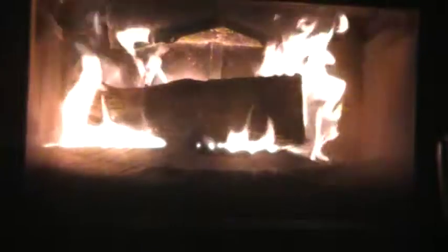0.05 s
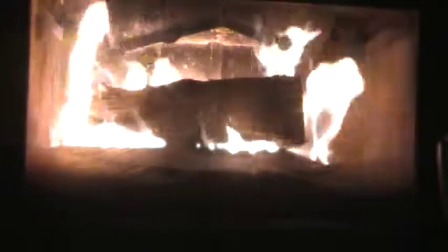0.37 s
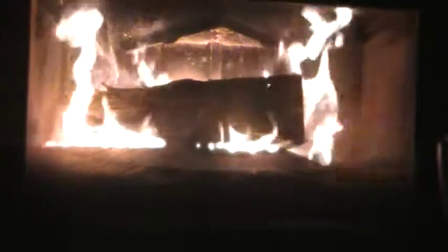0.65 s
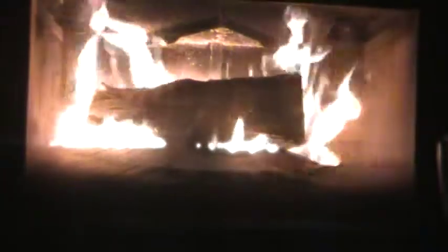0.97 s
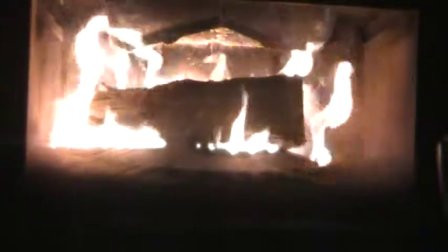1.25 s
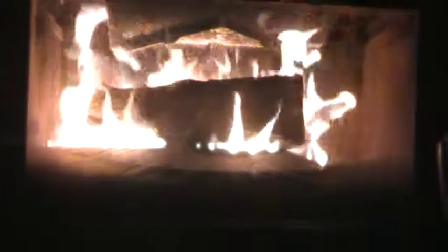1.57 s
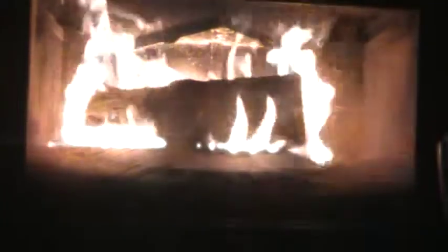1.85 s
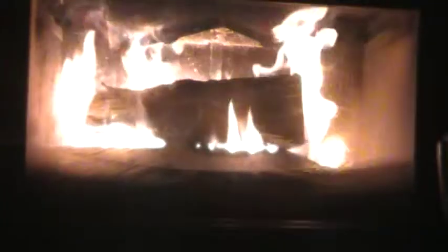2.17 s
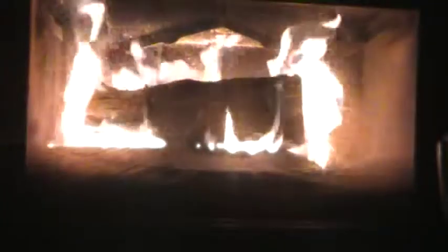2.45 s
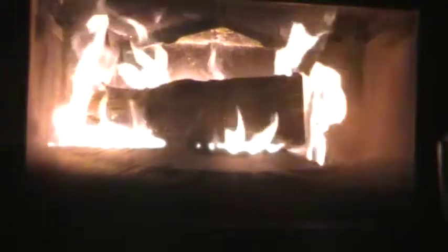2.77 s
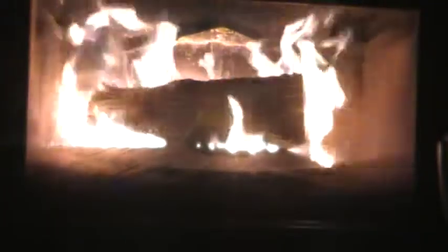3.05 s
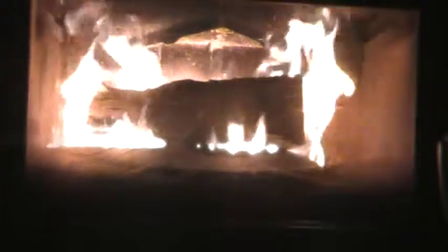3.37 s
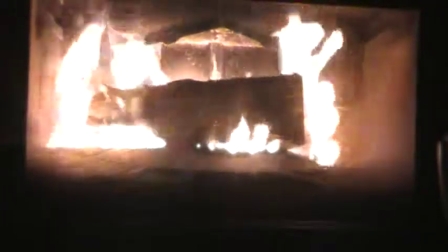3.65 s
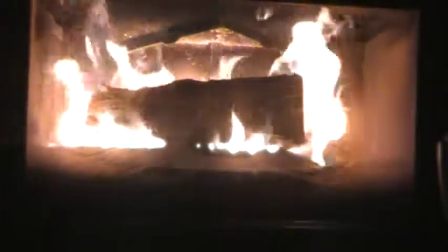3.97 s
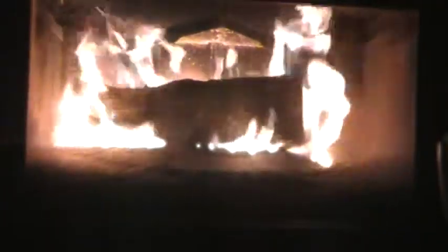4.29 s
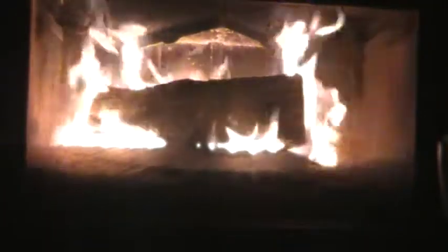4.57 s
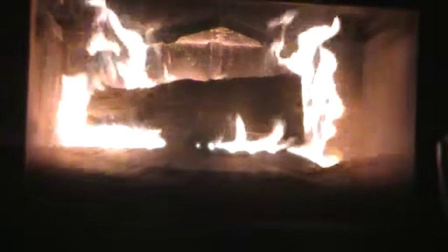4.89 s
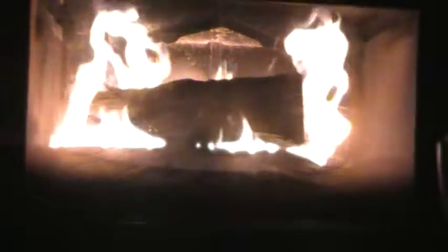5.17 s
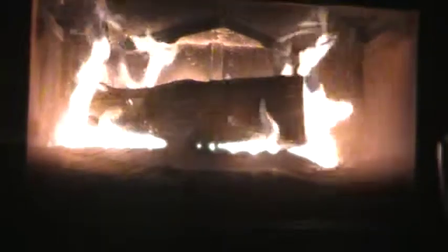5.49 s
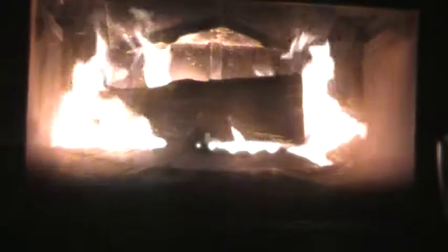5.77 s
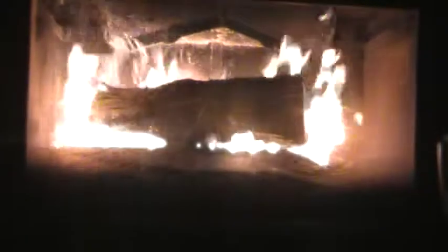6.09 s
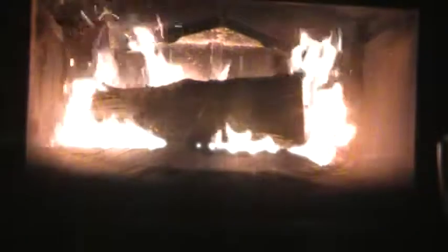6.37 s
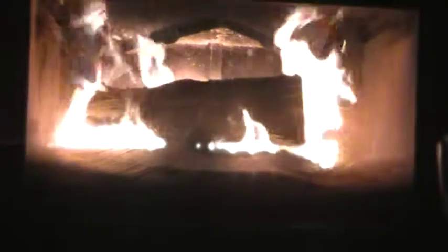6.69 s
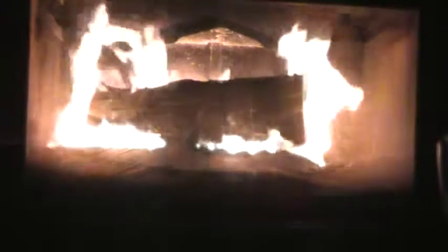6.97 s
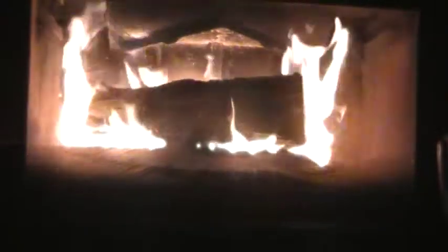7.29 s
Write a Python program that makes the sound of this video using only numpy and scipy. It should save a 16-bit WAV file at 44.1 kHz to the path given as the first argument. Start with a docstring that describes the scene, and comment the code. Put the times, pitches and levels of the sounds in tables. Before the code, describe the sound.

Logs burn in a closed fireplace in a quiet room, giving crisp, high crackles over ticking embers and a soft rush of flame. A few sharp snaps and dull knocks come from the firebox. Late on, the draught swells in the flue, one very loud snap rings out, and the flames rise to a gentle low roar. A brief sizzle comes near the end. The microphone picks up plenty of room reflection.

```python
"""Burning logs crackle in a closed fireplace in a quiet, live room: resin pockets burst in spits of tiny
fractures, heard mostly by way of the walls. Sharp snaps ring the firebox, one of them very loud,
and a few dull knocks sound from the fire. Underneath, embers tick, the flames rush softly and flare
into a low roar, the draught swells in the flue, and gas sizzles briefly from a log."""
import sys
import numpy as np
from scipy import signal
from scipy.fft import rfft, irfft
from scipy.io import wavfile
from scipy.ndimage import uniform_filter1d

SR = 44100
rng = np.random.default_rng(int(sys.argv[2]) if len(sys.argv) > 2 else 0)


def unload_wav(signal):
    """Save mono or channel-first audio to the path in sys.argv[1] as 16-bit WAV at rate SR, clipped to [-1, 1]."""
    wavfile.write(
        sys.argv[1],
        SR,
        np.round(np.clip(np.atleast_2d(signal).T, -1, 1) * 32767).astype(np.int16),
    )


N = 327663
TIME = np.arange(N) / SR
AGE = np.arange(SR) / SR  # seconds since a hit


def undb(db):
    """Decibels to gain."""
    return 10 ** (np.asarray(db) / 20)


def on_log_axis(points, hz):
    """Read a curve of (freq_hz, value) points at any frequency."""
    freq_hz, value = np.transpose(points)
    return np.interp(np.log(hz + 1), np.log(freq_hz), value)


def colour(x, spectrum):
    """EQ x with a spectrum; rms 1."""
    gain = undb(on_log_axis(spectrum, np.fft.rfftfreq(len(x), 1 / SR)))
    shaped = irfft(rfft(x) * gain, len(x))
    return shaped / np.std(shaped)


def noise(spectrum, size=SR):
    """Coloured noise, rms 1."""
    return colour(rng.standard_normal(size), spectrum)


def resonate(x, hz, width_hz):
    """One resonance, gain 1 at the centre."""
    return signal.lfilter(*signal.iirpeak(hz, hz / width_hz, fs=SR), x)


def high_pass(x, hz, order):
    """Roll off the lows."""
    return signal.sosfilt(signal.butter(order, hz, "high", fs=SR, output="sos"), x)


def fade(t60_s, rise_s):
    """Fast attack, exponential decay."""
    return (1 - np.exp(-AGE / rise_s)) * np.exp(-np.log(1000) * AGE / t60_s)


def swell(peak_s, db, rise_s, fall_s):
    """Gain of a flow that builds and ebbs: a bell with its own width on each side."""
    since = TIME - peak_s
    return undb(db) * np.exp(-(since / np.where(since < 0, rise_s, fall_s)) ** 2)


def flutter(rate_hz):
    """Random sample-and-hold, smoothed twice; spread near 1."""
    hold = int(SR / rate_hz)
    steps = np.repeat(rng.standard_normal(N // hold + 1), hold)
    return uniform_filter1d(uniform_filter1d(steps, hold), hold)[:N] * np.sqrt(2)


def attack_level(x, db, samples):
    """Scale x so that its first samples have an rms of db."""
    return x * undb(db) / np.sqrt(np.mean(x[:samples] ** 2))


def ring(modes, rise_s, pitch=1, length=1, scatter_cycles=0.2):
    """Damped modes struck together; each hit lands elsewhere and scatters their phases."""
    out = np.zeros(SR)
    for hz, db, t60_s in modes:
        cycles = pitch * hz * (AGE - rise_s) + scatter_cycles * rng.standard_normal()
        out += undb(db) * fade(t60_s * length, rise_s) * np.cos(2 * np.pi * cycles)
    return high_pass(out, hz=338, order=2)  # small surfaces radiate little bass


def add(out, start_s, x):
    """Mix x in at start_s."""
    i = max(0, int(start_s * SR))
    out[i:i + len(x)] += x[:max(0, N - i)]


# Reverb time of the room: freq_hz, t60_s
ROOM_DECAY = [(150, 0.4), (600, 0.84), (2500, 0.73), (5000, 0.67), (9000, 0.47), (15000, 0.28)]
def room_tail(send, rise_s):
    """Shape steady noise into the room's diffuse tail: it builds up, and the highs die first."""
    hz, age_s, bands = signal.stft(send, SR, nperseg=768)
    bands = bands * np.exp(-np.log(1000) * age_s / on_log_axis(ROOM_DECAY, hz)[:, None])
    return signal.istft(bands, SR)[1][:SR] * (1 - np.exp(-AGE / rise_s))


# EQ of the flames' airy rush and of their low roar: freq_hz, gain_db
RUSH_EQ = [(25, -27), (80, -22.5), (130, -14), (250, -6.5), (450, -1), (900, -0.5), (1500, -2),
           (1950, -1.5), (2700, -5.5), (5000, -8.5), (9000, -11.5), (12500, -13), (15800, -19)]
ROAR_EQ = [(60, -48), (110, -19), (160, -4), (210, -9.5), (290, 3), (380, 0.5), (600, -1), (1500, -27.5)]
# The one flare-up: peak_s, level_db, rise_s, fall_s
FLARE_UP = (6, -67.5, 0.55, 2)
def flames(rush_db=-60.5, flutter_db=0.6, calm_roar_db=-81):
    """A soft, even bed of flame; a low roar rises as it flares, then dies back slowly."""
    rush = noise(RUSH_EQ, size=N) * undb(rush_db + flutter_db * flutter(rate_hz=13))
    roar = noise(ROAR_EQ, size=N) * (undb(calm_roar_db) + swell(*FLARE_UP))
    return rush + roar


# Resonances of the flue: pitch_hz, width_hz, gain_db
FLUE_RESONANCES = [(430, 21, 3), (551, 31, -2), (1980, 360, -3.5)]
# Gusts up the flue: peak_s, level_db, rise_s, fall_s
DRAUGHT_GUSTS = [(5.07, -63.5, 0.26, 0.18), (5.37, -60, 0.11, 0.13), (7.35, -66, 0.46, .3)]
def draught(steady_db=-80, flutter_db=0.68):
    """Moving air hums at the flue's resonances and swells with each gust."""
    air = rng.standard_normal(N)
    flow = undb(steady_db) + sum(swell(*gust) for gust in DRAUGHT_GUSTS)
    hum = sum(undb(db) * resonate(air, hz, width_hz) for hz, width_hz, db in FLUE_RESONANCES)
    return hum / np.std(hum) * flow * undb(flutter_db * flutter(rate_hz=20))


# EQ of the thin, high sizzle: freq_hz, gain_db
SIZZLE_EQ = [(5000, -25), (6600, -5), (7050, 5), (7600, -9), (11000, -27)]
# The one puff of gas: peak_s, level_db, rise_s, fall_s
GAS_PUFF = (7.35, -63.5, .04, .06)
def gas_jet(flutter_db=2.8):
    """Gas escapes from a log in a short, sputtering sizzle."""
    return noise(SIZZLE_EQ, size=N) * swell(*GAS_PUFF) * undb(flutter_db * flutter(rate_hz=48.4))


# EQ of a bright click (also in snaps) and of woody body (also in crackles): freq_hz, gain_db
CLICK_EQ = [(1500, -16.5), (3500, -12), (4700, 5), (5700, -5), (7000, -2), (8400, 7.5), (10300, 8),
            (12000, 3.5), (15800, -19)]
WOOD_EQ = [(150, -28.5), (520, -2.5), (1400, -2.5), (2650, -3), (3200, 0.5), (4200, 0.5), (5000, -9),
           (8000, -19.5)]
def embers(ticks_per_s=22, level_db=-73, spread_db=1.0):
    """A texture of faint ticks at random moments, each with a short woody smear."""
    strengths = undb(-spread_db * np.clip(rng.standard_normal(N), -2, 2))
    triggers = (rng.random(N) < ticks_per_s / SR) * strengths
    click = noise(CLICK_EQ) * fade(0.019, rise_s=0.00018)
    smear = 0.5 * noise(WOOD_EQ) * fade(0.15, rise_s=0.00073)
    ticks = signal.fftconvolve(triggers, click + smear)[:N]
    return undb(level_db) * ticks / np.std(ticks)


# EQ of a dull thud: freq_hz, gain_db
THUD_EQ = [(60, -40), (115, -33), (165, 4.5), (220, 0.5), (300, -0.5), (430, 3.5), (650, -0.5), (900, 1),
           (2100, -2.5), (2800, -9.5), (4000, -8.5), (5800, -19), (9000, -13), (15800, -25)]
# Long ring of the firebox's metal panels (also in snaps): pitch_hz, gain_db, t60_s
PANEL_MODES = [(286, -12, 0.39), (323, -14, 0.86), (557, 0, 0.45), (588, -10, 0.67), (740, -8, 0.55),
               (848, -15.5, 0.64), (1200, -27, 0.34), (1333, -18, 0.54), (2080, -19, 0.3),
               (2143, -13.5, 0.44)]
# Knock cues: start_s, thud_db, panel_db, low_cut_hz
KNOCK_CUES = [(1.798, -49, -59, 105), (2.124, -55, -74, 900), (4.664, -51.5, -76, 400),
              (4.699, -54.5, -63, 90), (6.502, -53.5, -76, 756), (6.768, -56.5, -45, 220),
              (6.795, -57.5, -49, 242)]
def knocks(room_db=1.0):
    """Soft, dull hits, as of wood settling; big pieces reach lower, and some set the panels ringing."""
    out = np.zeros(N)
    for start_s, thud_db, panel_db, low_cut_hz in KNOCK_CUES:
        direct = noise(THUD_EQ) * fade(0.15, rise_s=0.00033)
        tail = undb(room_db) * room_tail(noise(THUD_EQ), rise_s=0.00059)
        thud = undb(thud_db) * high_pass(direct + tail, low_cut_hz, order=3)
        panels = undb(panel_db) * ring(PANEL_MODES, rise_s=0.00606)
        add(out, start_s, thud + panels)
    return out


# Short ring of the firebox: pitch_hz, gain_db, t60_s
FIREBOX_MODES = [(302, -17.5, 0.015), (523, -16.5, 0.018), (993, -13, 0.028), (1220, -15, 0.034),
                 (1510, -6.5, 0.032), (1990, -11, 0.025), (2200, 2.5, .017), (2360, -6.5, 0.014),
                 (2850, -0.5, 0.012), (3190, 1.5, 0.0078), (3720, -6, .007), (4800, -11.5, 0.01),
                 (6230, -22, 0.011), (8400, -27, 0.026), (9900, -9, 0.0042)]
# EQ of that ring's boom in the room: freq_hz, gain_db
BOOM_EQ = [(40, -56), (110, -44), (220, -24), (340, -12), (440, -13.5), (560, -8), (750, -6.5), (1200, 0),
           (2200, 1), (2550, -4.5), (3100, -3.5), (4200, -17), (6500, -22), (7500, -35), (15800, -53)]
# Snap cues: start_s, click_db, ring_db, ring_pitch_ratio, ring_length_ratio
SNAP_CUES = [(.701, -59.5, -69, 1, 1), (1.687, -53, -59, 1, 1), (2.0085, -55.5, -62, 1, 1),
             (3.449, -48, -52.5, 0.88, .7), (4.4042, -48.5, -47, 0.9, 1.2), (5.1565, -60, -63.5, 1, 1),
             (5.729, -53, -48, 0.7, 1), (5.895, -34, -11.5, .99, 1.15), (6.376, -46.5, -53.5, .93, 1.3),
             (6.8, -58, -63, 1, 1.05), (7.136, -58.5, -74, .93, 1), (7.178, -43, -47.5, 0.73, 1)]
def snaps(boom_send_db=-13.5, click_send_db=-20, panel_send_db=-23):
    """A sudden crack arrives directly: a click, the short ring of the firebox, then panels and room."""
    out = np.zeros(N)
    for start_s, click_db, ring_db, pitch, length in SNAP_CUES:
        click = noise(CLICK_EQ) * fade(0.016, rise_s=0.000124)
        click = attack_level(click, click_db, samples=176)
        box = ring(FIREBOX_MODES, rise_s=0.0012, pitch=pitch, length=length)
        box = attack_level(box, ring_db, samples=176)
        panels = undb(ring_db + panel_send_db) * ring(PANEL_MODES, rise_s=0.0025)
        send = undb(ring_db + boom_send_db) * noise(BOOM_EQ)
        send += undb(click_db + click_send_db) * noise(CLICK_EQ)
        add(out, start_s, click + box + panels + room_tail(send, rise_s=0.00056))
    return out


# EQ of the crisp resin spit: freq_hz, gain_db
SPIT_EQ = [(3000, -34), (5600, -6.5), (7700, 0), (9500, -0.5), (11800, 2), (13500, -2), (15800, -13)]
def crackle(spit_db, body_db, pitch_hz, grain_db=4.5, spit_send_db=-5.5, body_send_db=-1.0):
    """A resin pocket bursts in a pitched spit of tiny fractures; wood adds body and the room answers."""
    t60_s = 0.064 * 1.05 ** (spit_db + 51)  # 5 % longer per dB above a typical -51 dB spit
    fractures = rng.standard_normal(SR) * undb(grain_db * rng.standard_normal(SR))
    pocket = 0.73 * resonate(fractures, pitch_hz, width_hz=2800)
    spit = colour(fractures + pocket, SPIT_EQ) * fade(t60_s, rise_s=0.0016)
    spit = attack_level(spit, spit_db, samples=530)
    body = high_pass(noise(WOOD_EQ), hz=2300, order=1) * fade(0.085, rise_s=0.00093)
    body = attack_level(body, body_db, samples=530)
    send = undb(spit_db + spit_send_db) * noise(SPIT_EQ)
    send += undb(body_db + body_send_db) * noise(WOOD_EQ)
    return spit + body + room_tail(send, rise_s=0.0033)


# Foreground crackle cues: start_s, spit_db, body_db, pitch_hz
CRACKLE_CUES = [(.008, -58, -58.5, 11300), (.065, -55, -55.5, 10500), (.544, -52.5, -56.5, 11700),
                (1.118, -51.5, -57, 12000), (1.143, -55, -55.5, 8300), (1.235, -48, -58.5, 11100),
                (1.535, -51, -56, 7700), (1.695, -53, -54, 11700), (1.799, -60, -66, 9000),
                (2.141, -54.5, -63, 11300), (2.155, -53.5, -55.5, 9000), (2.329, -51, -56.5, 11700),
                (2.578, -63, -65, 9000), (2.947, -51.5, -60, 11100), (2.973, -50, -53, 11900),
                (3.242, -54.5, -56, 11200), (3.604, -52.5, -55, 12000), (3.624, -54, -67, 11300),
                (4.277, -51.5, -54, 8100), (4.336, -54.5, -56.5, 9700), (4.404, -51, -63, 11500),
                (4.505, -50.5, -55, 7800), (5.008, -51.5, -54, 11900), (5.423, -53, -55, 11100),
                (5.723, -46.5, -53, 11700), (5.792, -52.5, -53.5, 8100), (6.064, -52.5, -55, 12000),
                (6.349, -53, -55.5, 11300), (6.605, -52, -54.5, 8400), (6.666, -50.5, -59, 11200),
                (7.418, -51.5, -56, 11900)]
def crackles(faint_per_s=1.5, faint_db=-66.5, spread_db=1.5):
    """Resin bursts in the logs: clear crackles on cue, faint ones scattered at random."""
    out = np.zeros(N)
    for start_s, spit_db, body_db, pitch_hz in CRACKLE_CUES:
        add(out, start_s, crackle(spit_db, body_db, pitch_hz))
    for when, strength in rng.random((int(faint_per_s * N / SR), 2)):
        level_db = faint_db + spread_db * (2 * strength - 1)
        add(out, when * N / SR, crackle(level_db, level_db, pitch_hz=8800))
    return out


def scene():
    """The whole fire, mixed to mono."""
    return (crackles() + snaps() + knocks() + embers() + flames() + draught() + gas_jet())[None]


def record(dry, high_cut_hz=15900):
    """A steep high cut takes the very top off the mix."""
    return signal.sosfilt(signal.ellip(10, .1, 70, high_cut_hz, fs=SR, output="sos"), dry)


dry = scene()
out = record(dry)
unload_wav(out)
```